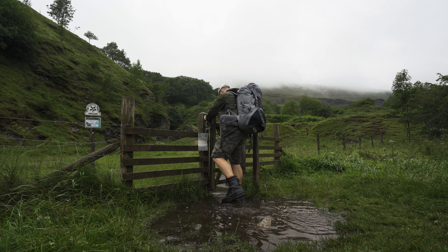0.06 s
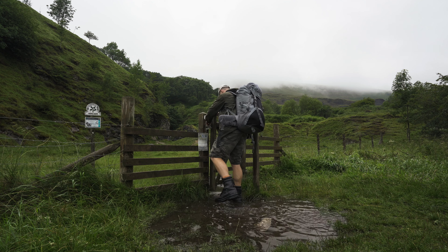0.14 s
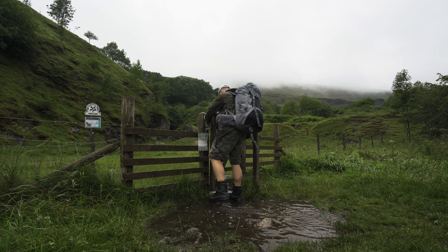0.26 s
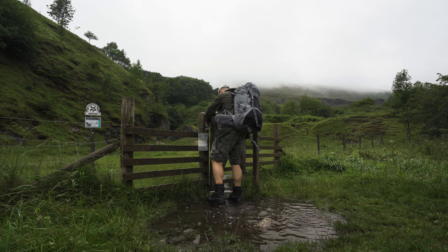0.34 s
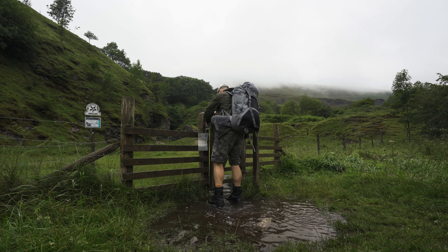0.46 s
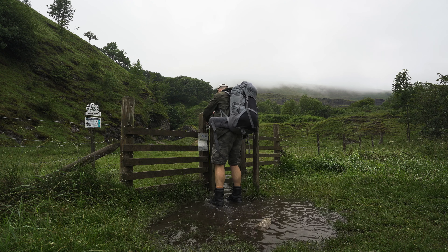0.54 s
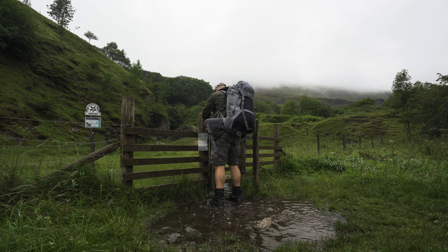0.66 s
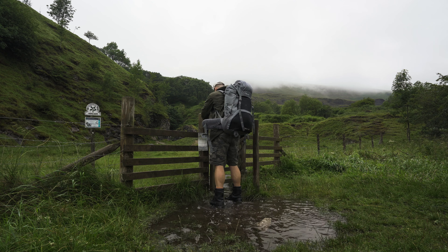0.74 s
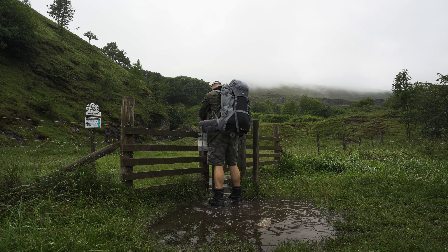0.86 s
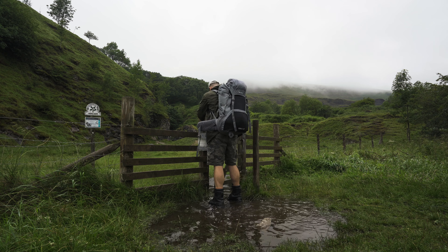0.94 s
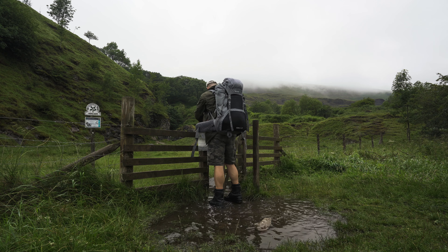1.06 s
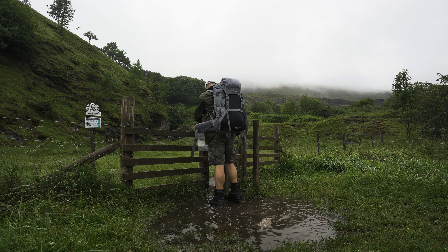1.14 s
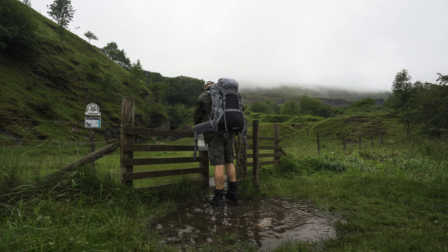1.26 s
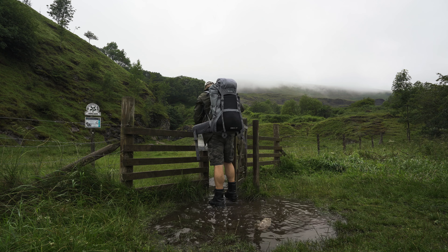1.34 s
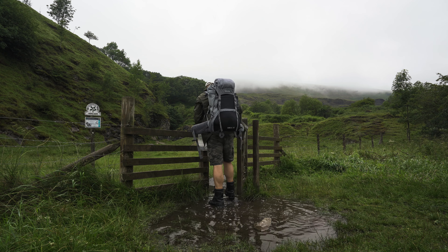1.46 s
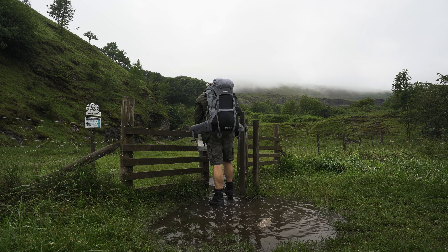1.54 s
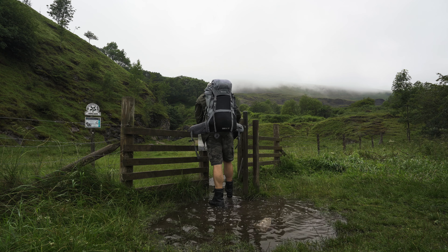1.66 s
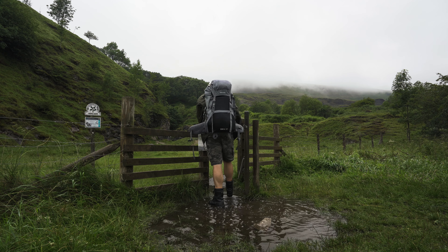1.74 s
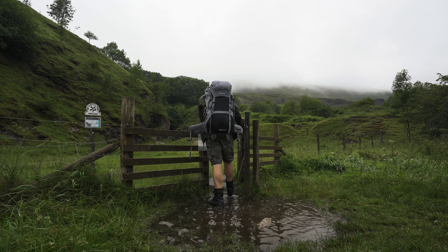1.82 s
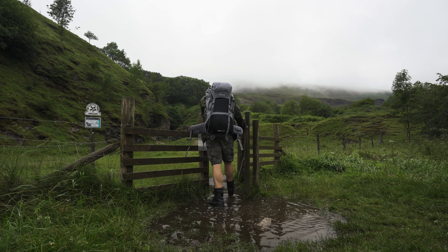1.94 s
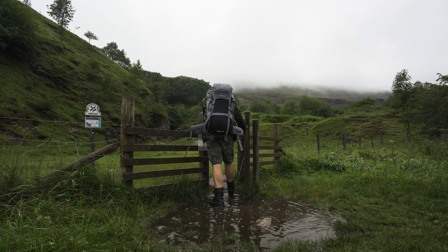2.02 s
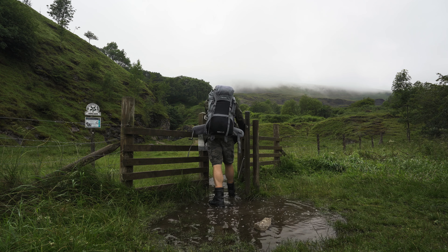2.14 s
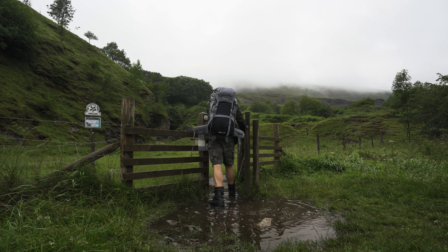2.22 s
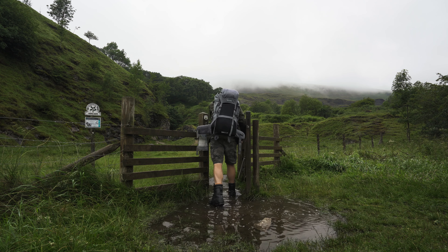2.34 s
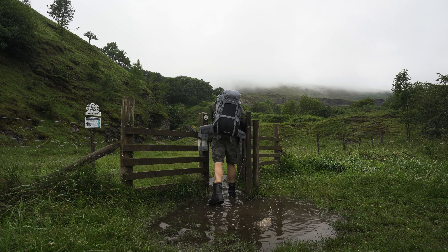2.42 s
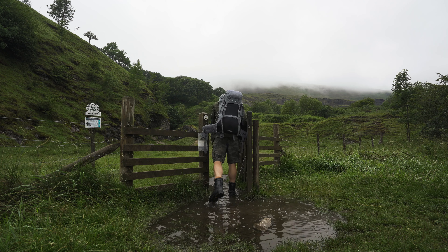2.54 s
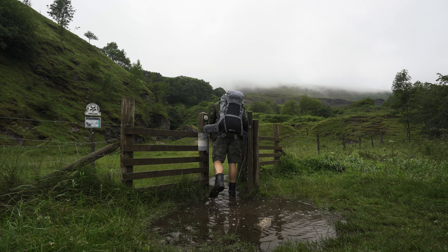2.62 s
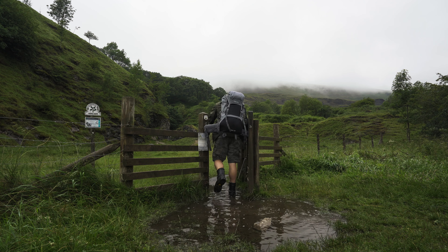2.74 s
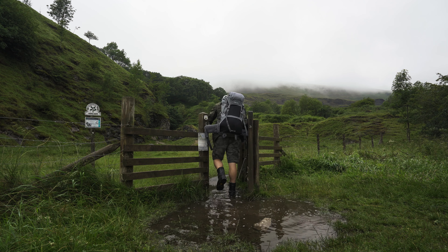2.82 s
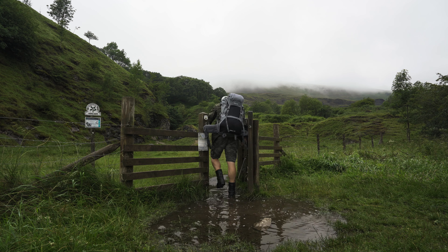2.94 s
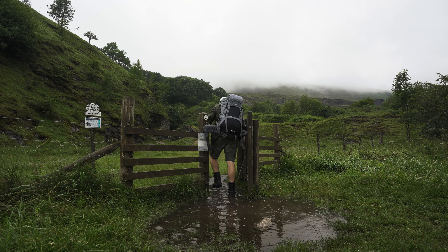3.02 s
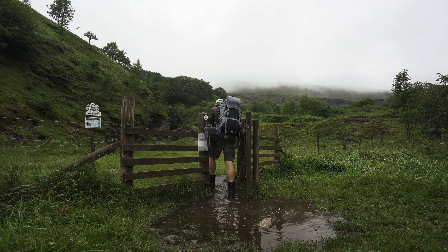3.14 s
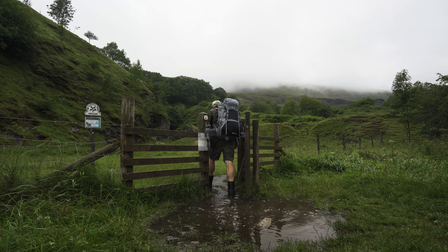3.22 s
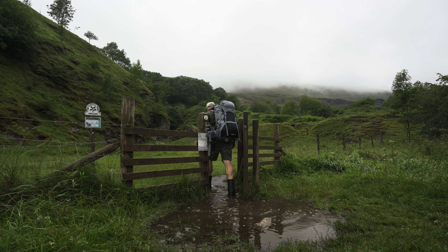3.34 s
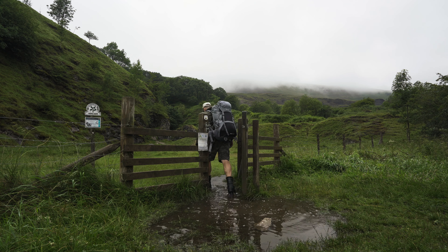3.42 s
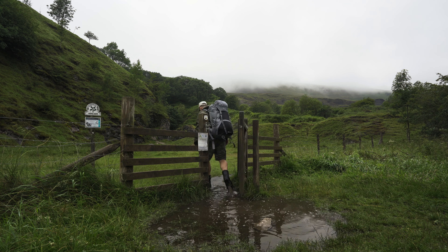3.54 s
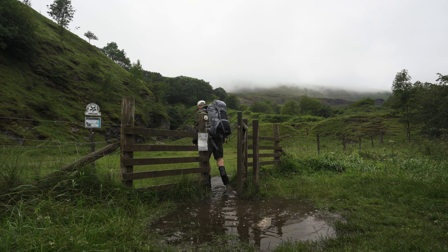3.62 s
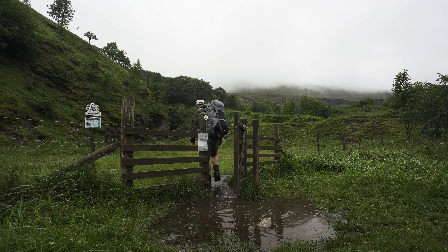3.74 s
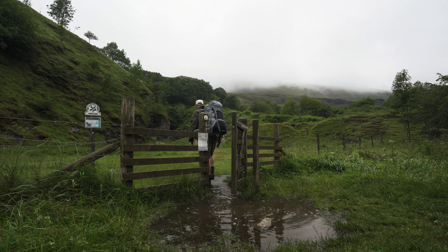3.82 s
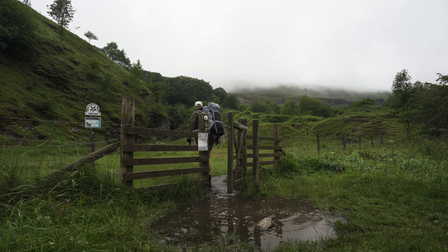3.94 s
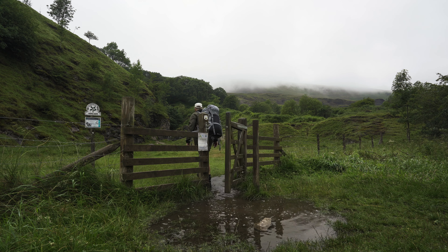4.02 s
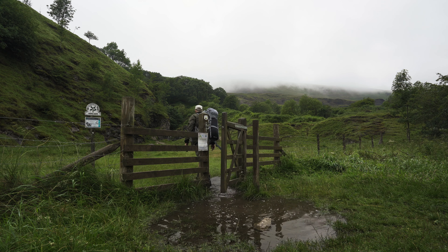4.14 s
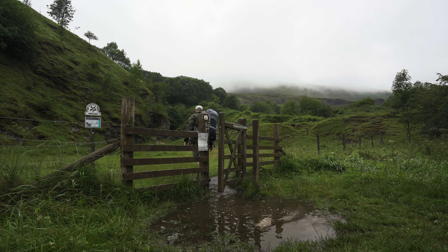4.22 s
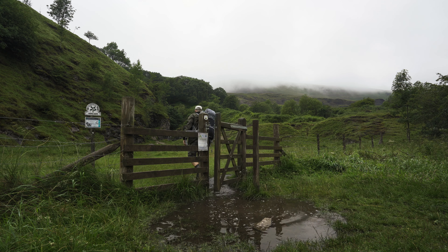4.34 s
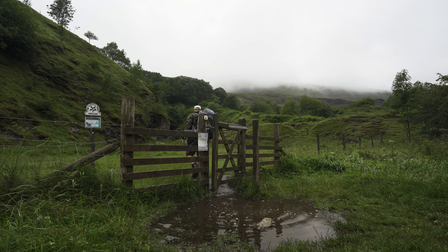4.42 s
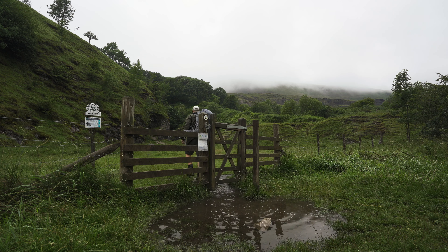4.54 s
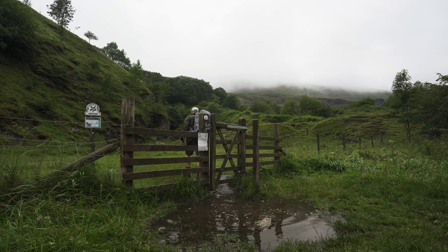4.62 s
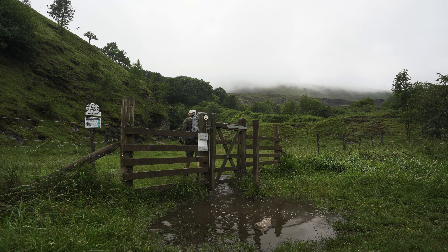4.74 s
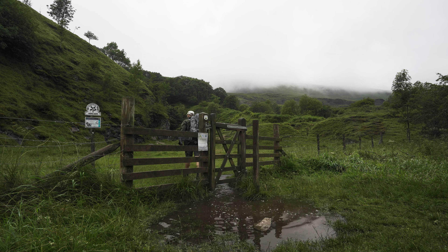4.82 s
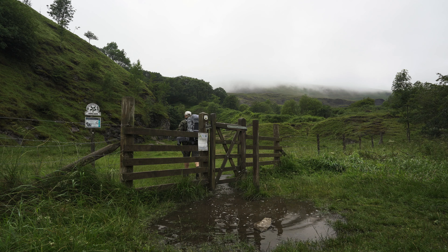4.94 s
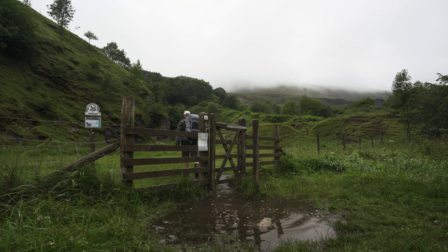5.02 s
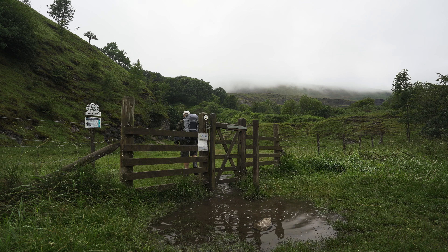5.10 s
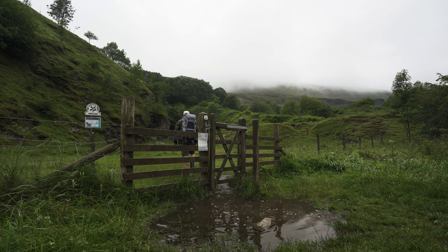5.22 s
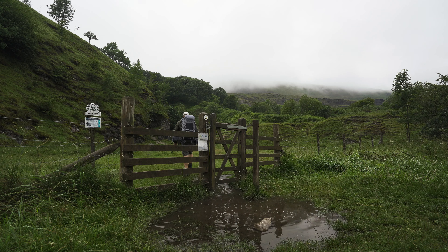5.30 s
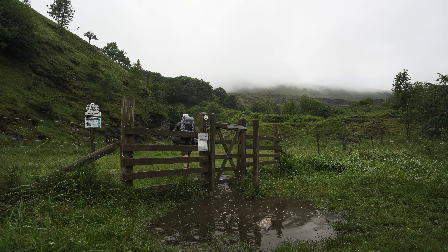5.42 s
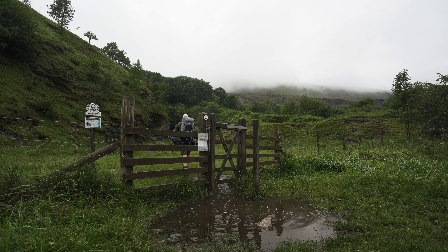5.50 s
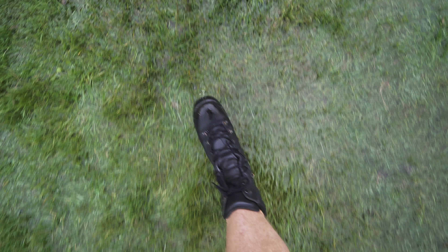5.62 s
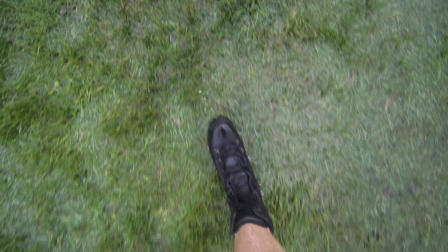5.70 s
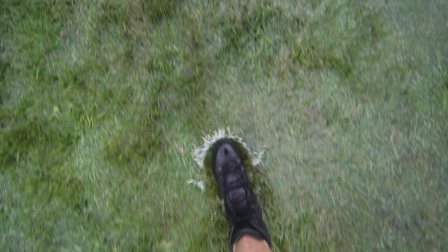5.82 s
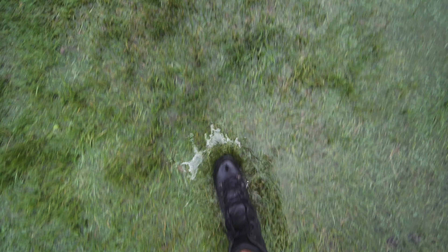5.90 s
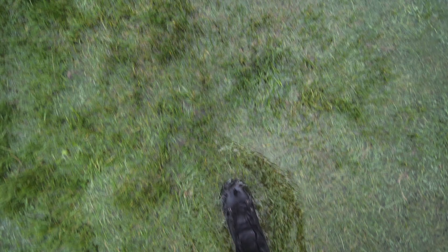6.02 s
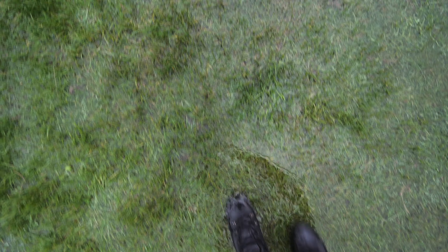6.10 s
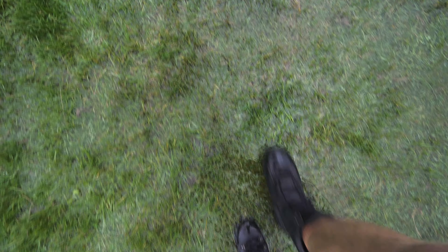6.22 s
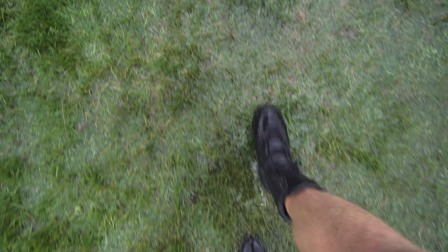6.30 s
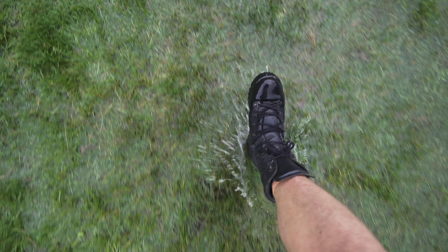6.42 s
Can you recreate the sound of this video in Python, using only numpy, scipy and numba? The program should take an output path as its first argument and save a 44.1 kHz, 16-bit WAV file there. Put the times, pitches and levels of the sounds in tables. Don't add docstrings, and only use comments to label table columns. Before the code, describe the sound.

Quiet drizzle, distant stream and thin bird calls; gate latch clicks, boots wade and gurgle, wood bangs shut, then loud wet footsteps on grass.

```python
import sys
import numpy as np
from scipy import signal
from scipy.fft import rfft, irfft, next_fast_len
from scipy.io import wavfile
from scipy.ndimage import uniform_filter1d
from numba import njit

SR = 44100
rng = np.random.default_rng(int(sys.argv[2]) if len(sys.argv) > 2 else 0)


def dump(signal):
    limited = np.clip(np.atleast_2d(signal).T, -1, 1)
    pcm = np.round(limited * 32767).astype(np.int16)
    wavfile.write(sys.argv[1], SR, pcm)


def attenuation_scalar(level_db):
    decades = np.asarray(level_db, float) / 20
    return 10 ** decades


N = 284884
TIME = np.arange(N) / SR


def track(tables, column, quiet_db=-110):
    out = np.full(N, float(quiet_db))
    for rows in map(np.array, tables):
        inside = (TIME >= rows[0, 0]) & (TIME <= rows[-1, 0])
        out[inside] = np.interp(TIME[inside], rows[:, 0], rows[:, column])
    return out


def noise():
    return rng.standard_normal(N)


def colour(x, points):
    hz, db = np.transpose(points)
    size = next_fast_len(N)
    bins_hz = np.arange(size // 2 + 1) * SR / size
    gain = attenuation_scalar(np.interp(np.log(bins_hz + 1), np.log(hz), db))
    y = irfft(rfft(x, size) * gain, size)[:N]
    return y / np.sqrt(np.mean(y ** 2))


def walk(rate):
    k = int(SR / rate)
    held = np.repeat(rng.standard_normal(N // k + 1), k)
    return 1.35 * uniform_filter1d(uniform_filter1d(held, k), k)[:N]


def flutter(x, edges, spread_db, rate):
    spectrum = rfft(x)
    hz = np.arange(len(spectrum)) * SR / N
    out = np.zeros(N)
    for low, high in zip(edges[:-1], edges[1:]):
        band = irfft(spectrum * ((hz >= low) & (hz < high)), N)
        out += band * attenuation_scalar(spread_db * walk(rate))
    return out


@njit
def rings(s, gain, hz, t60, rise, climb):
    out = np.zeros(N)
    for k in range(len(s)):
        phase, start = 0., int(s[k] * SR)
        for i in range(min(int(t60[k] * SR), N - start)):
            t = i / SR
            decay = np.exp(-np.log(1000) * t / t60[k])
            out[start + i] += gain[k] * np.sin(phase) * (1 - np.exp(-t / rise[k])) * decay
            phase += 2 * np.pi * min(hz[k] * 2 ** (climb[k] * t / t60[k]), .45 * SR) / SR
    return out


def bursts(s, db, t60):
    clicks = np.zeros(N)
    np.add.at(clicks, (np.asarray(s) * SR).astype(int), attenuation_scalar(db))
    fading = signal.lfilter([1], [1, -np.exp(-np.log(1000) / (t60 * SR))], clicks)
    return signal.lfilter([.06], [1, -.94], fading)


# (frequency [Hz], level [dB per Hz])
STREAM = [(35, -42), (60, -2), (228, -2), (297, -6), (336, -6), (1050, -9), (1320, -7.5), (1580, -10.5),
          (4000, -18.5), (5200, -46), (8800, -120)]
STREAM_DB = -56.5
# (frequency [Hz], level [dB per Hz])
HISS = [(2350, -16.5), (4000, 0), (5700, 0.5), (5930, -3.5), (8650, 2.5), (10200, -13.5), (13100, -5),
        (15100, -14.5), (16000, -18.5)]
# (time [s], wind rumble [dB], drizzle hiss [dB])
AIR = [
    [(0.0, -74, -54.5), (0.33, -50.5, -63.5), (1.19, -64.5, -63.5), (3.67, -60, -55.5), (3.97, -66, -66),
     (4.62, -59, -65.5), (4.66, -46, -61), (4.83, -41, -61), (5.29, -52.5, -64.5), (5.55, -63, -68),
     (5.71, -61, -62.5)],
    [(5.71, -44, -45), (5.92, -34, -63), (6.46, -43, -41.5)],
]


def valley():
    water = colour(noise(), STREAM)
    stream = flutter(water, [0, 200, 400, 800, 1500, 2600, SR / 2], spread_db=1.6, rate=21)
    drizzle_db = track(AIR, column=2) - 1.0 + 0.98 * walk(40) + 0.95 * walk(7.2)
    drizzle = colour(noise(), HISS) * attenuation_scalar(drizzle_db)
    wind = colour(noise(), [(12, -40.5), (30, -21.0), (40, 9.5), (60, -9.0), (150, -19.5), (400, -73)])
    sway = colour(noise(), [(5, 7), (14, -4), (30, -1.0), (70, -20.0), (300, -27), (700, -48.5)])
    rumble = np.where(TIME < AIR[1][0][0], wind, attenuation_scalar(5.) * sway)
    return attenuation_scalar(STREAM_DB) * stream + drizzle + attenuation_scalar(track(AIR, column=1)) * rumble


# (frequency [Hz], level [dB per Hz])
SPRAY = [(1180, -23), (2000, -3.5), (2760, -9), (2980, -4.5), (3740, -5.5), (4380, -4), (6040, -11),
         (8050, -4.5), (10300, -21.5), (12400, -14), (14000, -18.5), (16000, -28.5)]
# (frequency [Hz], level [dB per Hz])
THIN = [(500, -59.5), (1200, -7.5)]
DROPLETS = THIN + SPRAY[1:]


def pops(s, db, hz, tick_db, cycles):
    chance = rng.random((len(s), 3)).T
    life = cycles * (1.1 + 0.56 * chance[2]) / hz
    climb = np.full(len(s), .3)
    bubble = rings(s, attenuation_scalar(db + 3.5), hz, life, 0.069 * life, climb)
    sister_hz = hz * (1.3 + 1.0 * chance[1])
    sister = rings(s + 0.006 * chance[0], attenuation_scalar(db - 1), sister_hz, 0.76 * life, 0.13 * life, climb)
    tick = bursts(s, tick_db, t60=0.0061) * colour(noise(), DROPLETS)
    return bubble + sister + tick


# (time [s], peak level [dB], pitch [Hz])
BUBBLES = [(0.021, -37, 2320), (0.037, -32, 2800), (0.067, -37, 2440), (0.093, -39, 1760), (0.113, -32, 1420),
           (0.131, -27, 1580), (0.158, -31.5, 4000), (0.171, -32, 1430), (0.536, -20, 2070),
           (0.547, -23, 1910), (0.606, -33, 740), (0.616, -33, 2600), (0.722, -18.5, 1095),
           (0.747, -15.5, 2100), (0.748, -26, 893), (0.818, -38, 2600), (0.943, -36, 1430),
           (1.143, -35, 1240), (1.158, -34, 4500), (1.159, -37.5, 2050), (1.194, -45, 824),
           (1.233, -35.5, 1810), (1.278, -33.5, 1970), (1.29, -30.5, 1650), (1.381, -40, 1160),
           (1.419, -35, 1083), (1.455, -37, 2950), (1.481, -31, 2080), (1.511, -37, 2600), (1.566, -40, 1430),
           (1.605, -45, 734), (1.747, -45.5, 1030), (1.815, -40.5, 1580), (1.96, -40, 980),
           (2.149, -39, 1820), (2.262, -40, 1290),
           (2.441, -26.5, 2340), (2.656, -32.5, 915), (2.732, -29, 2080), (2.778, -28.5, 2040),
        (2.852, -27.5, 1770), (3.216, -34, 790), (3.226, -26.5, 1330), (3.258, -29.5, 750),
        (3.276, -27.5, 830), (3.286, -34, 770), (3.296, -30.5, 725), (3.306, -34, 722), (3.316, -40, 790),
        (3.392, -33, 2800), (3.467, -22.5, 1520), (3.605, -24, 1290), (3.633, -21, 1400),
        (3.646, -20, 1510), (3.652, -10, 1085), (3.675, -25, 1300), (3.704, -32, 1850), (3.73, -36, 1910),
        (3.765, -30, 3810), (3.802, -34, 2460), (3.784, -29, 1820), (3.838, -24, 1490),
        (3.873, -30.5, 1910), (3.885, -32, 2400), (3.93, -40.5, 2740), (3.959, -43, 2370),
        (4.33, -21, 2310), (4.337, -20, 1220), (4.423, -28.5, 884), (4.93, -40, 4250), (4.96, -40, 2920),
        (5.017, -33, 1740), (5.123, -40, 1640), (5.22, -41, 1640), (5.042, -25.5, 1340),
        (5.063, -27.5, 1770), (5.523, -36, 990)]
# (time [s], peak level [dB])
SPITS = [(0.548, -19.5), (0.556, -14), (2.168, -40), (2.313, -34), (2.687, -35), (2.872, -43), (0.611, -49),
         (0.628, -43), (0.635, -42), (0.7377, -24), (0.7756, -35), (3.697, -40), (3.735, -43), (3.801, -46),
         (3.87, -43), (3.959, -44.5), (3.3907, -45), (3.441, -47), (3.712, -38), (3.7595, -45),
         (3.7943, -45), (3.828, -47), (3.8524, -27)]
TICK_DB, TICK_PER_DB = -28.5, 1


def puddle():
    s, db, hz = np.transpose(BUBBLES)
    spit_s, spit_db = np.transpose(SPITS)
    spits = bursts(spit_s, spit_db - 0.5, t60=0.0089) * colour(noise(), HISS)
    return pops(s, db, hz, TICK_DB + TICK_PER_DB * db, cycles=17.0) + spits


def swarm(count, low_hz, high_hz, cycles, spread_db):
    chance = rng.random((count, 4)).T
    s = chance[0] * (N - 1) / SR
    hz = low_hz * (high_hz / low_hz) ** chance[1]
    life = cycles * (.5 + chance[2]) / hz
    gain = attenuation_scalar(-spread_db * np.log(1 - .99 * chance[3]))
    crowd = rings(s, gain, hz, life, .09 * life, np.full(count, .6))
    return crowd / np.sqrt(np.mean(crowd ** 2))


# (time [s], length [s], slosh level [dB], spray level [dB])
SPLASHES = [(0.154, 0.016, -48, -44.5), (0.528, 0.02, -27, -30.5), (0.551, 0.0099, -34.5, -28.5),
            (0.592, 0.041, -33, -70), (0.72, 0.013, -21, -39.5), (0.737, 0.017, -23, -36.5),
            (0.774, 0.0091, -49, -42), (1.14, 0.039, -55, -54.5), (1.23, 0.26, -54, -59),
            (2.3, 0.069, -36, -39.5), (2.422, 0.096, -40.5, -59.5), (2.508, 0.063, -39, -54.5),
            (2.686, 0.016, -36, -54), (3.206, 0.028, -36, -50.5), (3.258, 0.05, -37.5, -52),
            (3.345, 0.019, -41, -47), (3.477, 0.035, -35, -42), (3.627, 0.035, -28, -49.5),
            (3.701, 0.018, -53, -47), (3.774, 0.067, -45, -49.5), (3.827, 0.076, -56, -48.5),
            (4.22, 0.035, -45, -46.5), (4.283, 0.028, -32, -41), (4.322, 0.017, -27, -40.5),
            (4.361, 0.075, -45.5, -57), (4.887, 0.1, -41.5, -52), (5.009, 0.064, -37.5, -43.5),
            (5.52, 0.013, -43.5, -51), (5.638, 0.028, -47, -50.5)]
# (time [s], length [s], slosh level [dB], spray level [dB])
TREADS = [(5.719, 0.0052, -64, -38.5), (5.746, 0.031, -27, -37.5), (5.801, 0.018, -27, -40),
          (5.826, 0.022, -18, -22.5), (5.852, 0.057, -30.5, -27.5), (5.928, 0.028, -21.5, -46),
          (5.969, 0.039, -28, -44), (6.029, 0.025, -36.5, -41.5), (6.067, 0.053, -53, -45.5),
          (6.283, 0.033, -48, -37.5), (6.352, 0.051, -35.5, -27.5), (6.412, 0.045, -64.5, -45)]


def thrown(column, tail_s):
    gain = np.zeros(N)
    for row in SPLASHES + TREADS:
        start, length = int(row[0] * SR), int(row[1] * SR)
        gain[start:start + length] = attenuation_scalar(row[column]) * np.sin(np.linspace(.35, 2.6, length)) ** 1.8
    fall = np.exp(-1 / (tail_s * SR))
    linger = np.exp(-1 / (0.06 * SR))
    falling = signal.lfilter([1 - fall], [1, -fall], gain)
    dripping = signal.lfilter([1 - linger], [1, -linger], gain)
    return np.maximum(gain, falling) + attenuation_scalar(-17) * dripping


# (time [s], slosh level [dB])
STIR = [
    [(0.0, -48), (0.51, -59), (3.27, -48), (3.71, -42), (3.92, -60.5), (4.68, -54.5), (4.81, -57),
     (5.22, -66.5), (5.7, -62)],
    [(5.71, -75), (5.854, -46), (6.46, -49.5)],
]
GRASS_DB = -3.5


def splashes():
    sizes_db = 3.3 * np.minimum(rng.exponential(size=N), 5.5)
    drops = noise() * attenuation_scalar(sizes_db) * (rng.random(N) < .25)
    mist = flutter(colour(drops, DROPLETS), [0, 3200, 6000, 10300, SR / 2], spread_db=2.5, rate=90)
    spray = mist * attenuation_scalar(2.0 * walk(200))

    slosh = swarm(count=6000, low_hz=553, high_hz=3350, cycles=9.5, spread_db=3.5)
    slosh += attenuation_scalar(-8.5) * swarm(count=1200, low_hz=164.0, high_hz=600, cycles=4.0, spread_db=4.5)
    crackle = swarm(count=5000, low_hz=870, high_hz=4500, cycles=7.3, spread_db=5.0)
    slosh += attenuation_scalar(GRASS_DB) * crackle * (TIME > TREADS[0][0])
    drips = swarm(count=420, low_hz=916, high_hz=4650, cycles=46, spread_db=-1.0)

    stir_db = track(STIR, column=1)
    slosh_gain = attenuation_scalar(stir_db - 8.0) + attenuation_scalar(-10.0) * thrown(column=2, tail_s=0.0058)
    slosh_gain = uniform_filter1d(slosh_gain, int(0.003 * SR))
    spray_gain = attenuation_scalar(-1.0) * thrown(column=3, tail_s=0.014)
    return attenuation_scalar(stir_db - 11.5) * drips + slosh_gain * slosh + spray_gain * spray


# (time [s], length [s], start pitch [Hz], end pitch [Hz], level [dB])
BIRDS = [(.08, .022, 3800, 4200, -56), (.355, .015, 5300, 5600, -62), (4.04, .02, 4900, 5200, -62),
         (4.873, .012, 4900, 5150, -59), (.895, 0.089, 4254, 4680, -63.5), (4.518, 0.023, 4700, 5050, -54),
         (4.571, 0.026, 3360, 4200, -55), (5.101, 0.019, 4516, 4700, -54), (5.128, .018, 5000, 5200, -57),
         (5.239, 0.13, 5880, 5200, -60)]


def birds():
    out = np.zeros(N)
    for s, length, start_hz, end_hz, db in BIRDS:
        age = np.linspace(0, 1, int(length * SR))
        hz = start_hz + (end_hz - start_hz) * age ** 0.78
        whistle = np.sin(2 * np.pi * np.cumsum(hz) / SR)
        start = int(s * SR)
        out[start:start + len(age)] += attenuation_scalar(db + 1.0) * np.sin(np.pi * age) ** 0.67 * whistle
    return out


FAVOUR_DB, FAVOUR_OCTAVES = 10, .22


def strike(s, db, share, modes, scatter_db, detune, rise, near_hz=None):
    hz, mode_db, t60 = np.transpose(modes)
    chance = rng.standard_normal((len(s), 2, len(hz)))
    if near_hz is not None:
        octaves = np.log2(hz / near_hz[:, None])
        mode_db = mode_db + FAVOUR_DB * (np.exp(-(octaves / FAVOUR_OCTAVES) ** 2) - .5)
    gain = attenuation_scalar(db[:, None] + mode_db + scatter_db * chance[:, 0]) * np.sign(chance[:, 1])
    pitch = hz * (1 + detune * chance[:, 1])
    life = np.clip(share, .2, 3)[:, None] * np.minimum(t60, .09)
    onset, climb = np.full(gain.size, rise), np.zeros(gain.size)
    return rings(np.repeat(s, len(hz)), gain.ravel(), pitch.ravel(), life.ravel(), onset, climb)


# (time [s], peak level [dB], latch ring [dB], crack [dB], loudest rail [Hz])
BLOWS = [(0.193, -18, -17.5, -1.5, 1900), (0.199, -21, -45, -21, 730), (0.22, -24.5, -40.5, -21, 1500),
         (0.241, -14, 1.5, -20, 1700), (0.259, -6, -37.5, 3.5, 2000), (0.2655, -8, -36, -9, 750),
         (0.288, -36, -45, -8, 2600), (0.331, -26, -31, -10, 1400), (0.641, -2.5, -36.5, -5.5, 1800),
         (0.6455, -8, -43.5, -13, 740), (0.652, -17, -44, -20, 1300), (0.667, -30.5, -38, 8, 3200),
         (4.633, -13, -31, -9, 1300), (4.6445, -1.5, -37, 0, 1900), (4.649, -6, -42.5, -12.5, 1900),
         (4.654, -14.5, -37, -28, 1320), (4.661, -15, -45, -21, 3100), (4.668, -6, -43.5, -10, 1750),
         (4.684, -16, -23.5, -10, 1900), (4.696, -4, -29, -24.5, 1800), (4.7156, -3.5, -7.5, 2, 1450),
         (4.726, -6.5, -40, -30, 1400), (4.741, -21, -45, -10, 1300), (4.752, -7, -9, -8, 1400),
         (4.762, -2, -22.5, 2, 2400), (4.777, -7, -40, -11, 4000), (4.797, -16, -33.5, 3, 2200),
         (4.825, -28, -52, -34, 1950), (4.843, -6, -53, -28, 1650), (4.85, -20, -54.5, -25, 2000),
         (4.857, -22, -24, -6, 1900), (4.888, -16.5, -32, -16, 1350)]
# (time [s], peak level [dB])
THUMPS = [(0.257, -31), (0.287, -33.5), (0.649, -34), (4.631, -10), (4.644, -24), (4.665, -22),
          (4.775, -24.5), (4.799, -29.5)]
# (frequency [Hz], level [dB], t60 [s])
WOOD = [(638, -7.5, 0.15), (735, 4.5, 0.041), (1040, -20.5, 0.17), (1170, -8.5, 0.06), (1320, -2.5, 0.062),
        (1410, -2, 0.02), (1550, -13, 0.079), (1720, 2, 0.016), (1872, 1.5, 0.016), (2092, -1.5, 0.077),
        (2310, 2, 0.039), (2600, -4, 0.05), (2740, -20, 0.052), (3330, -3, 0.046), (4020, -10, 0.045),
        (4487, -15, 0.055)]
# (frequency [Hz], level [dB], t60 [s])
POST = [(93.5, -17, 0.16), (144, -9.5, 0.12), (205, -4, 0.032), (253, -5, 0.095), (297, -7.5, 0.12),
        (430, 4.5, 0.032)]
# (frequency [Hz], level [dB per Hz])
CHATTER = [(600, -18), (1300, 4), (2100, 5), (2900, -9), (4100, -12), (5000, -22.5), (9000, -36.5)]
POST_SHARE_DB = -35
HARD_DB, HARD_SHORTENS = -9, 0.01
WOOD_RING, CHATTER_DB = .38, -5


def gate():
    s, db, _, crack_db, rail_hz = np.transpose(BLOWS)
    share = 1.5 - HARD_SHORTENS * np.clip(db - HARD_DB, 0, None)
    wood = strike(s, db - 9.5, WOOD_RING * share, WOOD, scatter_db=3, detune=.03, rise=.0011,
                  near_hz=rail_hz)

    thump_s, thump_db = np.transpose(THUMPS)
    post_s = np.r_[s, thump_s]
    post_db = np.r_[db + POST_SHARE_DB, thump_db + 3]
    post_share = np.r_[share, np.full(len(thump_s), .8)]
    post = strike(post_s, post_db, post_share, POST, scatter_db=3, detune=.04, rise=.001)

    crack = bursts(s, db + crack_db - 10.5, t60=0.028) * colour(
        noise(), [(1500, -43.5), (3000, 12.0), (9000, 6.0), (10500, -15.0), (12800, -3), (16000, -20.0)])
    buzz = bursts(s, db - 19.5, t60=0.058) * colour(
        noise(), [(150, -9.5), (700, 17.0), (2000, -8.0), (4500, -8.0), (9000, -43.0), (16000, -22)])
    rattle = attenuation_scalar(3.9 * walk(300)) * colour(noise(), CHATTER)
    chatter = bursts(s, db + CHATTER_DB, t60=0.027) * rattle
    return wood + post + crack + buzz + chatter


# (frequency [Hz], level [dB], t60 [s])
LATCH = [(4080, -7, .025), (5500, -19, .04), (5760, -22, .02), (7000, -12, .028), (8580, 1, .036),
         (12700, -9, .028)]
CONTACT_DB = -19


def latch():
    s, db, ring_db, crack_db, _ = np.transpose(BLOWS)
    lands = db + crack_db > CONTACT_DB
    spell, stops = np.cumsum(lands), np.r_[s[lands], N / SR]
    out = np.zeros(N)
    for k in np.unique(spell):
        now = spell == k
        free = strike(s[now], (db + ring_db - 1.5)[now], np.full(np.sum(now), 1.5), LATCH,
                      scatter_db=2.5, detune=.004, rise=.0003)
        out += free * np.exp(-np.clip(TIME - stops[k], 0, None) / .0015)
    return out


# (time [s], level [dB],
# start pitch [Hz], climb [octaves], length [s])
GURGLES = [(0.667, -41, 430, 0.47, 0.05), (0.701, -32, 790, 1.14, 0.026), (0.732, -36, 600, 0.79, 0.025),
           (1.212, -46.5, 760, 0.17, 0.028), (1.27, -40.5, 1280, 0.2, 0.018), (0.652, -42, 75, 0.96, 0.061),
           (2.197, -42, 1500, 1.5, 0.012), (2.286, -34, 270, 0.97, 0.002), (2.314, -24, 1180, 0.32, 0.0079),
           (2.55, -39, 336, -0.12, 0.018), (2.687, -24.5, 650, 1.58, 0.02), (2.798, -32.5, 178, 0.48, 0.03),
           (2.869, -40.5, 1730, 0.97, 0.013), (3.522, -37.5, 1020, .48, 0.025),
           (4.174, -23.5, 294, -0.99, 0.0056), (4.633, -6, 347, 0.17, 0.007), (4.641, -16, 402, 0.19, .012),
           (4.664, -22, 380, 0, .015), (4.776, -23.5, 402, 0, .012), (4.825, -33, 1980, 0, .015),
           (4.778, -20.5, 4050, -0.009, .009), (4.753, -17.5, 3190, 0, .006), (.642, -24, 6150, 0, .009),
           (6.0, -32, 2250, .15, .013), (2.3, -43, 1220, .1, .01), (2.6, -43, 1320, 0.14, .01),
           (0.68, -42, 600, 1.2, .05), (5.833, -27, 370, -.2, 0.01), (4.634, -32, 92, -1.6, 0.056),
           (1.512, -51.5, 870, -0.0024, 0.028), (1.568, -51, 1600, 0.78, .03),
           (5.214, -39, 110, 0.83, 0.017)]


def gurgles():
    out = np.zeros(N)
    for s, db, hz, climb, length in GURGLES:
        age = np.linspace(0, 1, int(length * SR))
        swell = np.sin(np.pi * age ** 0.48) ** 0.48
        tone = np.sin(2 * np.pi * np.cumsum(hz * 2 ** (climb * age)) / SR)
        start = int(s * SR)
        out[start:start + len(age)] += attenuation_scalar(db) * swell * tone
    return out


# (time [s], peak level [dB], pitch [Hz], tick level [dB])
SQUELCH = [(5.716, -30, 724, -34), (5.741, -12.5, 2030, -37), (5.752, -14, 3620, -34),
           (5.761, -14, 1060, -39), (5.814, -15.5, 1580, -21), (5.836, -6.5, 2150, -9.5),
           (5.844, -8.5, 1010, -14), (5.8497, -4.5, 2600, -14), (5.858, -4.5, 1530, -15),
           (5.87, -18, 1390, -26), (5.883, -7.5, 1820, -29), (5.904, -27, 3140, -32),
           (5.926, -8, 1550, -41), (5.941, -22, 756, -39), (5.967, -20, 3200, -17.5),
           (5.975, -17, 2900, -27), (5.983, -23, 780, -18.5), (6.002, -13, 2130, -44),
           (6.036, -24, 3100, -38), (6.062, -29, 1000, -33), (6.046, -13, 2740, -43),
           (6.103, -28, 3900, -30), (6.126, -40, 3000, -24), (6.29, -18, 4380, -23.5),
           (6.356, -21.5, 980, -15.5), (6.377, -10, 1510, -34), (6.384, -10, 2960, -29),
           (6.417, -28, 4220, -29)]


def squelches():
    return pops(*np.transpose(SQUELCH), cycles=6.3)


SCATTER_HZ = 4430


def scene():
    near = puddle() + splashes() + gate() + gurgles() + squelches()
    decay = np.exp(-np.log(1000) * np.arange(8000) / (.13 * SR))
    tail = signal.lfilter(*signal.butter(1, SCATTER_HZ, fs=SR), rng.standard_normal(8000)) * decay
    scatter = signal.fftconvolve(near, tail / np.sqrt(np.sum(tail ** 2)))[:N]
    return (valley() + near + attenuation_scalar(-16.5) * scatter + birds() + latch())[None]


def roll_off(x):
    return signal.sosfilt(signal.butter(12, 16430, fs=SR, output="sos"), x)


def record(dry):
    low_pass = signal.ellip(6, .1, 30, 15900, fs=SR, output="sos")
    mix = signal.sosfiltfilt(low_pass, np.clip(dry, -1, 1))
    return roll_off(mix)


dry = scene()
out = record(dry)
dump(out)
```